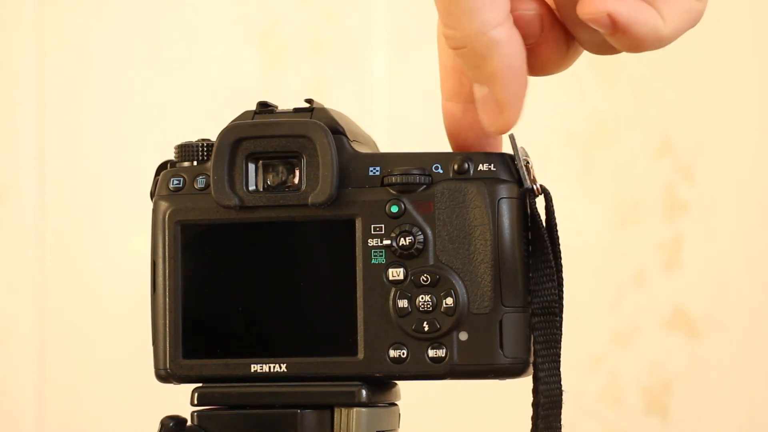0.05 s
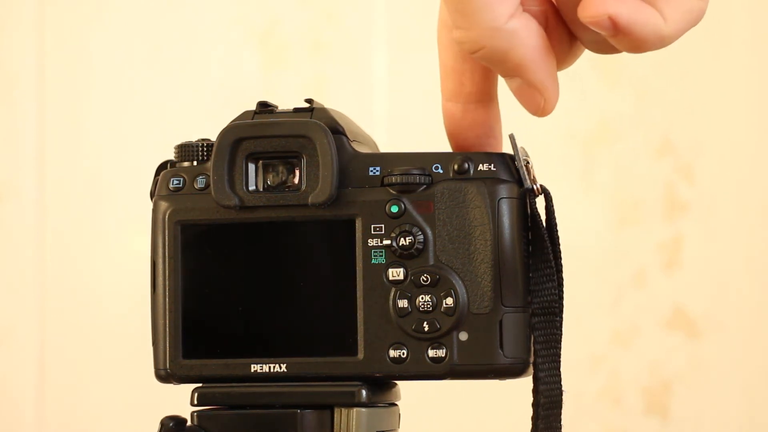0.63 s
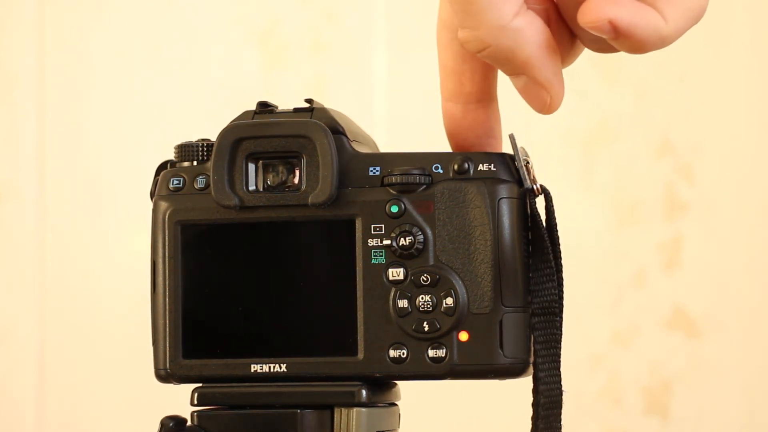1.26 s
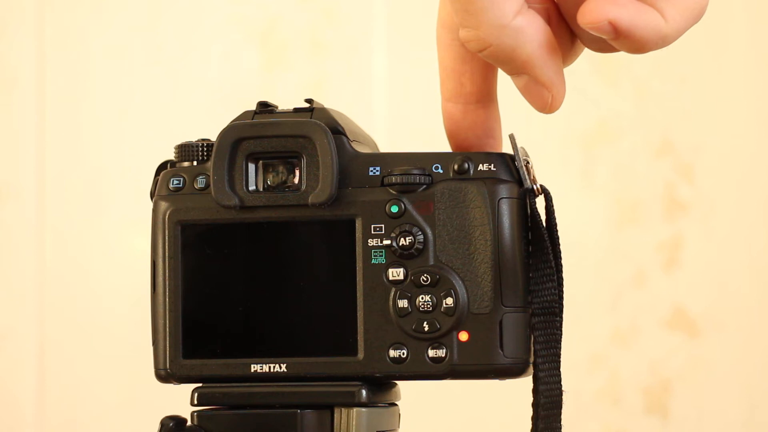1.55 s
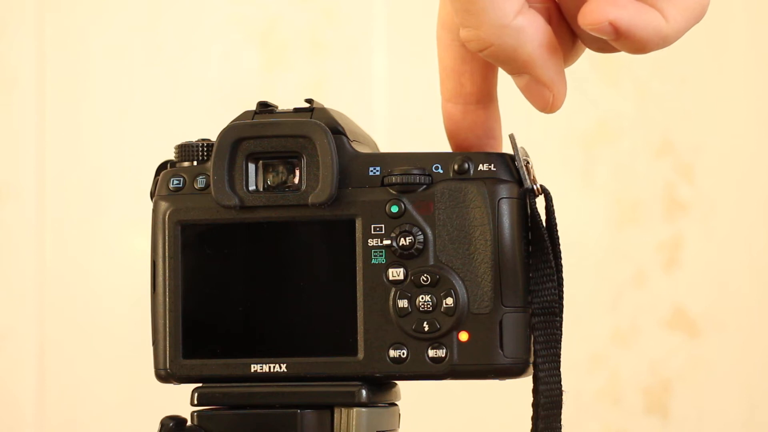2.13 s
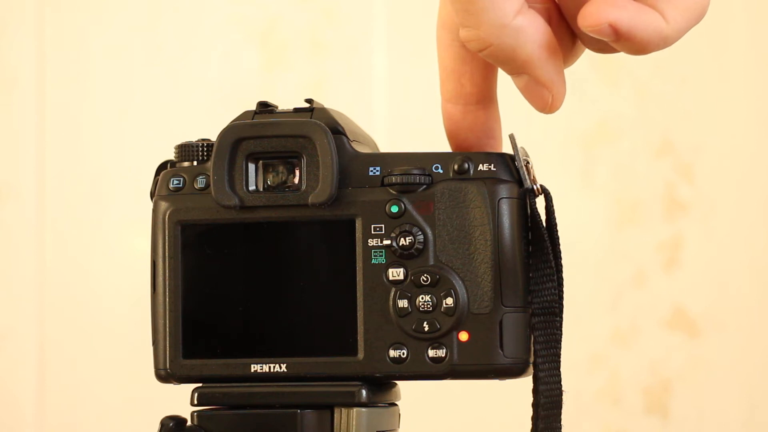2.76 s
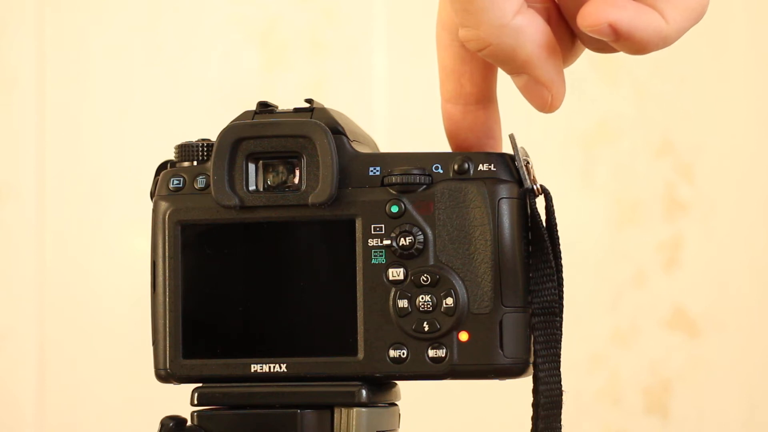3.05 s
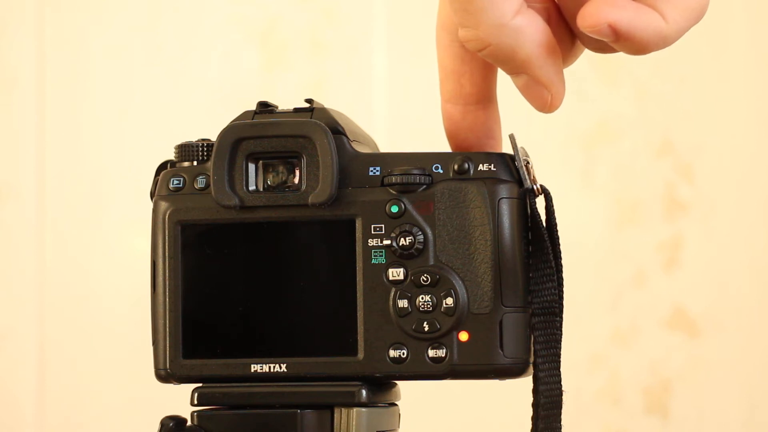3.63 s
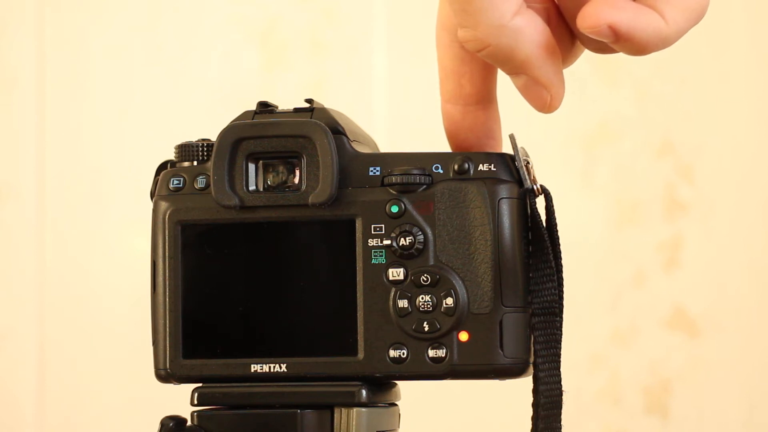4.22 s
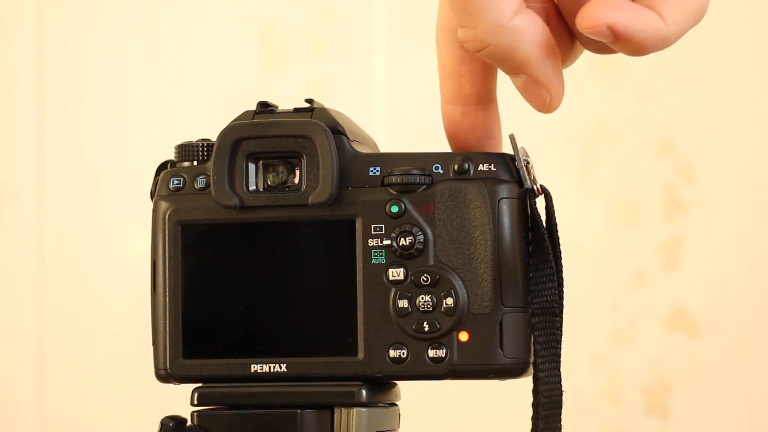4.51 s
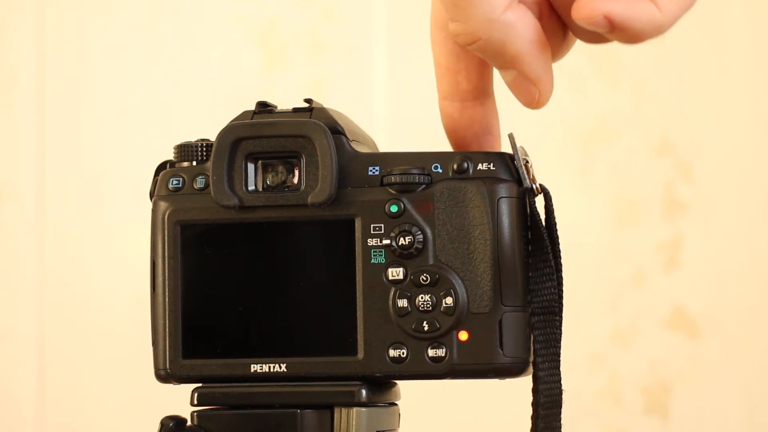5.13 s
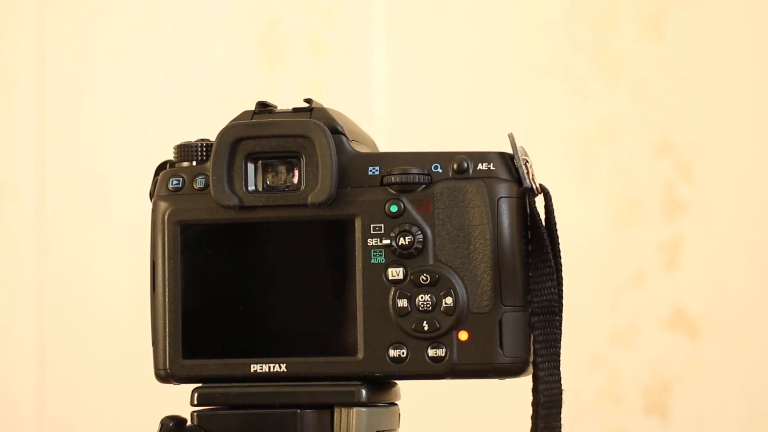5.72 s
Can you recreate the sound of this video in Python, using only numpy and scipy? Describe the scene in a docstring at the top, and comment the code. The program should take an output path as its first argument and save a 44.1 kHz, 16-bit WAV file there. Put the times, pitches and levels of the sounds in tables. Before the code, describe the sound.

A camera shutter fires a rapid burst of mechanical clacks, then one more single click, in a quiet small room.

```python
"""Camera burst in a quiet room

A reflex camera on a tripod fires a burst of 22 frames in a small room, then one frame more.
In each frame a motor lifts the mirror, two shutter curtains snap across and bounce, and the mirror
rattles back while the shutter is wound again. The recoil makes the tripod mount thump softly.
A few faint, dull ticks sound in the pauses, over a low hiss."""
import sys
import numpy as np
from scipy import signal
from scipy.fft import rfft, irfft, next_fast_len
from scipy.io import wavfile
from scipy.ndimage import uniform_filter1d

SR = 44100
rng = np.random.default_rng(int(sys.argv[2]) if len(sys.argv) > 2 else 0)


def dump_mix(stems):
    """Bounce the given channels to the path in sys.argv[1] as a 16-bit WAV at rate SR."""
    frames = np.atleast_2d(stems).T  # one column per channel
    limited = np.clip(frames, -1, 1)  # hard clip at full scale
    pcm = np.round(limited * 32767).astype(np.int16)
    wavfile.write(sys.argv[1], SR, pcm)


N = 258867
TIME = np.arange(N) / SR
FFT_SIZE = next_fast_len(N + SR // 2, True)
FFT_HZ = np.fft.rfftfreq(FFT_SIZE, 1 / SR)

# room and microphone hiss, shared by left and right or opposed: (frequency [Hz], level [dB])
HISS_SHARED = [(20, -37.5), (35, -45.5), (70, -46), (125, -44.5), (250, -51.5), (500, -53), (1400, -56.5),
               (2200, -59.5), (4500, -62), (8000, -68), (10000, -67.5), (13000, -65)]
HISS_OPPOSED = [(20, -45), (60, -54), (130, -46.5), (300, -46), (1400, -48.5), (2200, -53.5), (4500, -59.5),
                (8000, -66.5), (10000, -66.5), (13000, -64.5)]
# how much of the room's echo differs between left and right: (frequency [Hz], gain [dB])
ECHO_WIDTH = [(100, -25), (500, -11), (1800, -10.5), (3800, -4.5), (5500, -8.5), (8500, -5.5), (11000, 8.5),
              (15000, 9)]
# the left microphone picks up a little more bass and treble: (frequency [Hz], gain [dB])
LEFT_MIC_TONE = [(100, 1.36), (700, 0), (6000, 0.5), (12000, 1.7)]
# faint ticks: (time [s], level [dB], swell and fade time [s])
TICKS = [(3.504, -46, 0.034), (4.504, -47, 0.03), (5.087, -46.5, 0.022), (5.486, -46, 0.031)]
# the tone of each source: (frequency [Hz], gain [dB])
TICK_TONE = [(300, -23), (800, -9), (1250, 6.5), (1900, -9), (2800, -16), (4500, -18), (8000, -39)]
GEAR_TONE = [(60, -26.5), (130, -1.5), (380, -4), (600, -1), (1500, 3.5), (2300, -1), (3000, -2.5),
             (5300, -3), (6500, -7.5), (8800, -4), (11000, -12.5), (14000, -25)]
MIRROR_TONE = [(50, -8), (120, -8), (380, -13), (550, -7.5), (1000, -3), (1600, 4.5), (2300, -2.5),
               (2900, -8.5), (4400, -8), (5300, 2), (6600, -22), (8400, -7), (10300, -34), (14000, -32)]
SHUTTER_TONE = [(50, -21), (170, -12), (350, -17), (600, -7.5), (870, -1.5), (1150, -2), (2000, 1.5),
                (2800, -5), (3700, -3), (5300, -5), (8000, -9), (10000, -15.5), (12000, -24.5),
                (15000, -35.5)]
# pitches at which the camera body and tripod ring: (frequency [Hz], width [Hz], boost [dB])
BODY_RESONANCES = [(528, 35, 4.5), (596, 26, 7.5), (845, 30, 2), (980, 45, 4), (1435, 45, 4), (1615, 35, 2),
                   (1825, 35, 2), (2020, 90, 3), (2310, 35, 3), (2460, 60, 6), (2993, 70, 3),
                   (3445, 45, 2.5), (3585, 50, 3.5), (3705, 70, 4.5), (5152, 190, 3), (6245, 75, 2),
                   (6780, 90, 4), (7600, 100, 3)]
# runs of evenly spaced frames; the burst stumbles once:
# (first shutter release [s], spacing [s], frames [count], level [dB])
FRAME_RUNS = [(.0377, .15375, 7, 0), (1.0986, 0, 1, -1.1), (1.2455, .15467, 14, .2), (4.643, 0, 1, -.2)]
# Delays below count from the shutter release; negative means before it.
# low thumps of the mount: (delay [s], frequency [Hz], time to fade by 60 dB [s], level [dB])
MOUNT_THUMPS = [(-.030, 125, .07, -54.5), (0, 155, 0.053, -46.5), (.010, 191.2, 0.12, -43),
                (0.027, 95.7, .1, -47), (.064, 119, 0.11, -57.5)]
# the motor lifts the mirror, then winds the shutter: (delay [s], length [s], level [dB])
MOTOR_RUNS = [(-.046, 0.041, -37.5), (0.019, 0.068, -36.5)]
# a lever engages, the mirror hits its upper stop, a catch lets go, the mirror lands and settles:
# (delay [s], level [dB], treble tilt [dB per octave], ring time [s])
MIRROR_HITS = [(-.0455, -15, -2.5, 0.0028), (-.0205, -8.5, -1.9, .003), (.0524, -14, -4, 0.0021),
               (.0596, -5.5, 0.5, 0.0017), (.0686, -7, 0.5, 0.0027)]
# latch, first curtain, second curtain:
# (delay [s], level [dB], treble tilt [dB per octave], ring time [s])
SHUTTER_HITS = [(-.0028, -12, -0.5, 0.0011), (.0001, 1, 2, 0.0018), (.0055, 2, 1.28, 0.0028)]


def from_db(db):
    """Turn decibels into a gain."""
    return 10 ** (np.asarray(db) / 20)


def causal_filter(gain, size):
    """A filter with these gains that makes no sound before the hit (minimum phase)."""
    cepstrum = irfft(np.log(gain + 1e-9), size)
    cepstrum[1:size // 2] *= 2
    cepstrum[size // 2 + 1:] = 0
    return np.exp(rfft(cepstrum))


def shape_tone(sound, tone):
    """Filter a sound with a curve drawn through the points of a tone table."""
    hz, db = np.transpose(tone)
    gain = from_db(np.interp(np.log(FFT_HZ + 1), np.log(hz), db))
    return irfft(rfft(sound, FFT_SIZE) * causal_filter(gain, FFT_SIZE), FFT_SIZE)[:N]


def mix_in(out, start_s, sound):
    """Add a short sound at the given time."""
    at = int(round(start_s * SR))
    lo, hi = max(at, 0), min(at + len(sound), N)
    if hi > lo:
        out[lo:hi] += sound[lo - at:hi - at]


def frames():
    """List every frame as (release time [s], level [dB])."""
    return [(start + k * spacing, db) for start, spacing, count, db in FRAME_RUNS for k in range(count)]


def hiss(tone):
    """The quiet room and the microphones give a steady noise."""
    return shape_tone(rng.standard_normal(N), tone)


def faint_ticks():
    """Soft, blurred ticks of noise that swell and fade."""
    loudness = sum(from_db(db) * np.exp(-abs(TIME - at) / fade_s) for at, db, fade_s in TICKS)
    return shape_tone(loudness * rng.standard_normal(N), TICK_TONE)


def room_echo(sound, fade_s=0.29, gap_s=0.002, level_db=-6.5):
    """Many reflections arrive after a short gap and die away."""
    t = TIME[:SR // 3]
    onset = np.clip(t / gap_s - 1, 0, 1)
    tail = rng.standard_normal(len(t)) * from_db(-60 * t / fade_s) * onset
    return from_db(level_db) * signal.fftconvolve(sound, tail / np.linalg.norm(tail))[:N]


def mount_thumps(rise_s=0.0023, spread_db=1.5):
    """Each recoil of mirror and shutter sets the mount swinging for a few cycles."""
    t, out = TIME[:SR // 5], np.zeros(N)
    for delay, hz, fade_s, db in MOUNT_THUMPS:
        loudness = from_db(db - 60 * t / fade_s) * (1 - np.exp(-t / rise_s))
        swing = loudness * np.sin(2 * np.pi * hz * t)
        for release, frame_db in frames():
            mix_in(out, release + delay, from_db(frame_db + spread_db * rng.standard_normal()) * swing)
    return out


def body_ring(sound):
    """Each resonance of the body and tripod boosts a narrow band of pitch and rings on."""
    filters = []
    for hz, width, db in BODY_RESONANCES:
        damping, tuning = np.pi * width / SR, -2 * np.cos(2 * np.pi * hz / SR)
        boost = damping * from_db(db)
        band = np.array([1 + boost, tuning, 1 - boost, 1 + damping, tuning, 1 - damping])
        filters.append(band / (1 + damping))
    return signal.sosfilt(filters, sound + 1e-18)


def winding_gears(spin_up_s=0.007, run_down_s=0.0093, roughness_db=2.5):
    """Gear teeth and levers rasp in tiny uneven clicks as the motor starts, runs and stops."""
    t, drive = TIME[:SR // 5], np.zeros(N)
    for delay, length, db in MOTOR_RUNS:
        speed = (1 - np.exp(-t / spin_up_s)) * np.exp(-np.maximum(t - length, 0) / run_down_s)
        for release, frame_db in frames():
            mix_in(drive, release + delay, from_db(db + frame_db) * speed)
    teeth = rng.standard_normal(N) * from_db(roughness_db * rng.standard_normal(N))
    return shape_tone(drive * teeth / teeth.std(), GEAR_TONE)


def part_ring(fade, tilt_db):
    """A small struck part rings briefly at many close pitches, bright or dull."""
    size = len(fade)
    hz = np.fft.rfftfreq(size, 1 / SR)
    spectrum = rfft(rng.standard_normal(size) * fade)
    even_out = 1 / np.sqrt(uniform_filter1d(abs(spectrum) ** 2, size=21))   # like power in each band
    tilt = from_db(tilt_db * np.log2(np.clip(hz, 700, 10000) / 2500))
    return irfft(spectrum * causal_filter(even_out * tilt, size), size)


def with_bounces(hits, gap_s, gap_ratio, first_loss_db, loss_db, tilt_drop, ring_s):
    """Follow each hit with three duller bounces, ever closer together and weaker."""
    rows = list(hits)
    for delay, db, tilt_db, _ in hits:
        for k in range(3):
            delay += gap_s * gap_ratio ** k
            rows.append((delay, db - first_loss_db - k * loss_db, tilt_db - tilt_drop, ring_s))
    return rows


def strike_parts(hits, chatter, spread_db):
    """Loose parts meet and chatter in every frame, a little early or late, harder or softer."""
    out = np.zeros(N)
    for delay, db, tilt_db, ring_s in hits:
        scatter_s = min(0.03 * abs(delay), 0.0009)   # timing is tightest near the release
        fade = np.exp(-TIME[:2048] / ring_s)
        ring = part_ring(fade, tilt_db)
        for release, frame_db in frames():
            late, harder = rng.standard_normal(2)
            force = chatter * rng.standard_normal(len(ring)) * fade / np.linalg.norm(fade)
            force[0] += 1   # the clean hit that starts the chatter
            click = signal.fftconvolve(ring, force / np.linalg.norm(force))
            strength = from_db(db + frame_db + spread_db * harder)
            mix_in(out, release + delay + scatter_s * late, strength * click)
    return out


def mirror_rattle():
    """The mirror flips up and drops back, rattling against its stops."""
    hits = with_bounces(MIRROR_HITS, gap_s=0.003, gap_ratio=0.9,
                        first_loss_db=4.5, loss_db=5.0, tilt_drop=1.6, ring_s=0.0028)
    return shape_tone(strike_parts(hits, chatter=1.23, spread_db=1.0), MIRROR_TONE)


def shutter_snap():
    """A latch clicks, then the two curtains snap across and bounce."""
    hits = with_bounces(SHUTTER_HITS, gap_s=0.0072, gap_ratio=0.88,
                        first_loss_db=6.0, loss_db=2.5, tilt_drop=3.0, ring_s=0.0027)
    return shape_tone(strike_parts(hits, chatter=0.35, spread_db=1.52), SHUTTER_TONE)


def scene():
    """The camera stands straight ahead; the echo and the hiss spread to the sides."""
    moving_parts = shutter_snap() + mirror_rattle() + winding_gears()
    camera = from_db(-3.0) * body_ring(moving_parts) + mount_thumps()
    middle = camera + room_echo(camera) + faint_ticks() + hiss(HISS_SHARED)
    side = shape_tone(room_echo(camera), ECHO_WIDTH) + hiss(HISS_OPPOSED)
    return np.array([shape_tone(middle + side, LEFT_MIC_TONE), middle - side])


def record(dry):
    """The recorder drops one narrow band of treble and steeply cuts the very top."""
    notch_hz, cutoff_hz = 11220, 15900
    notched = signal.lfilter(*signal.iirnotch(notch_hz, Q=45, fs=SR), dry)
    top_cut = signal.ellip(12, 0.2, 80, cutoff_hz, fs=SR, output="sos")
    return signal.sosfilt(top_cut, notched)


dry = scene()
out = record(dry)
dump_mix(out)
```